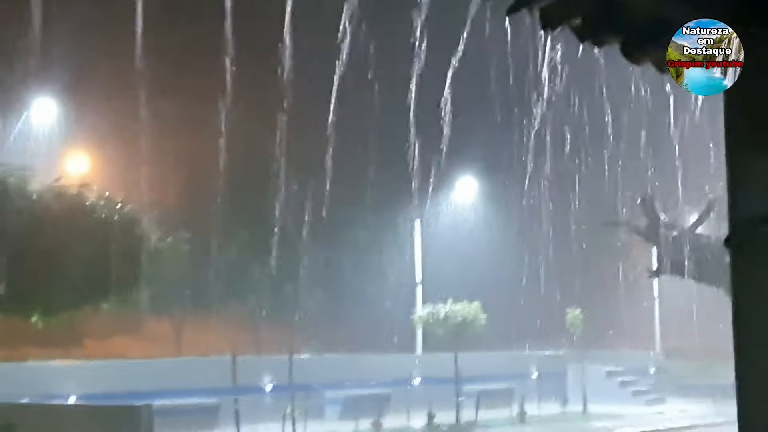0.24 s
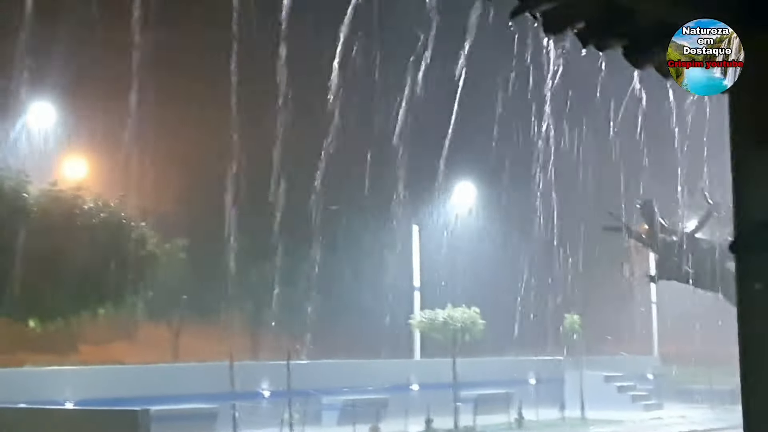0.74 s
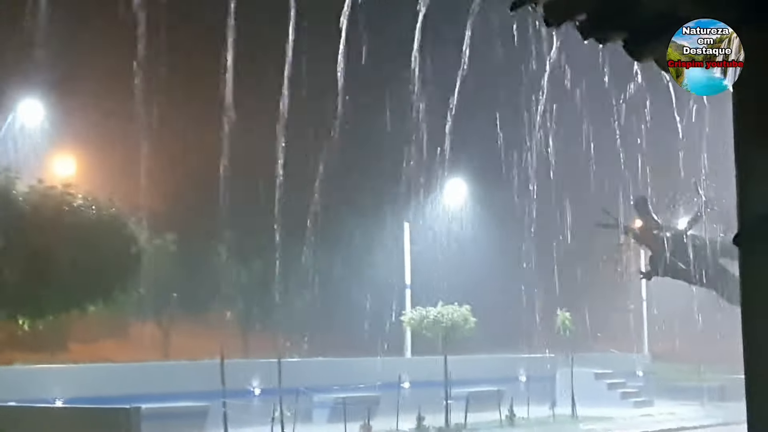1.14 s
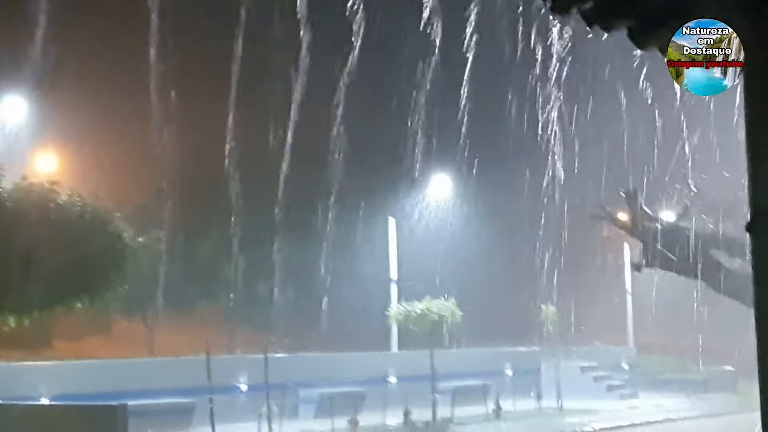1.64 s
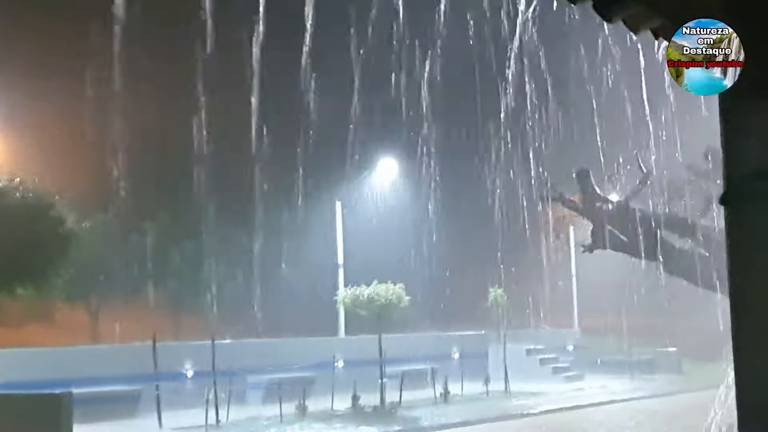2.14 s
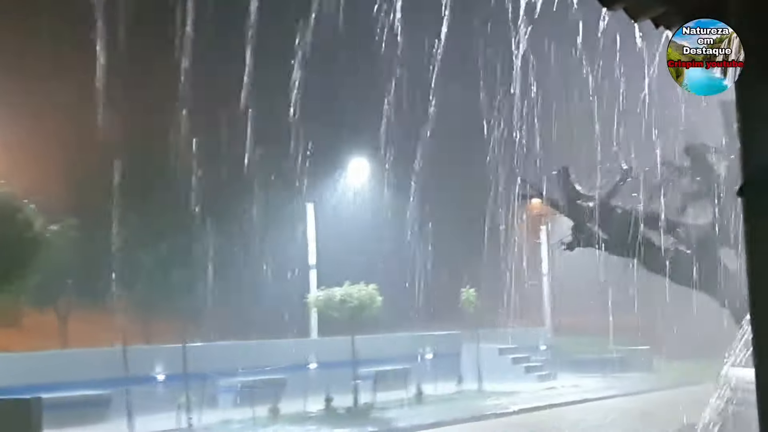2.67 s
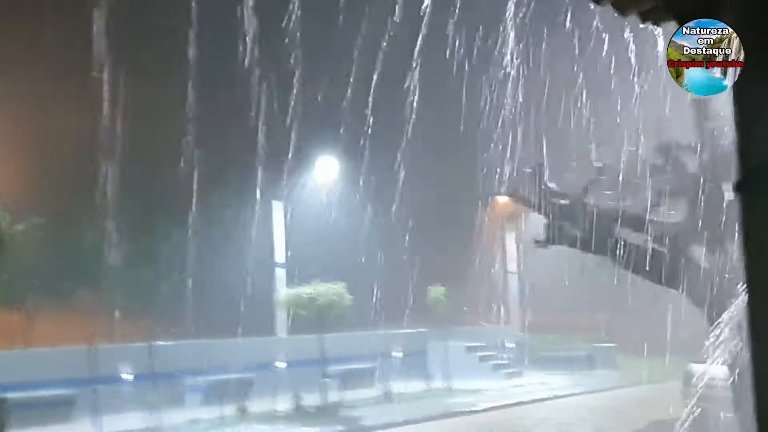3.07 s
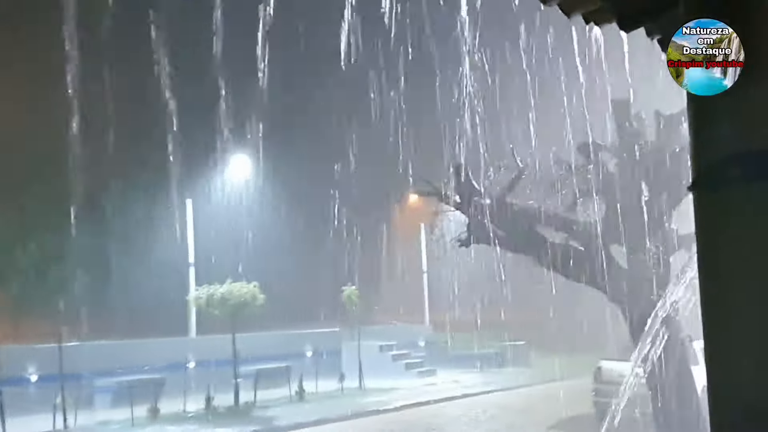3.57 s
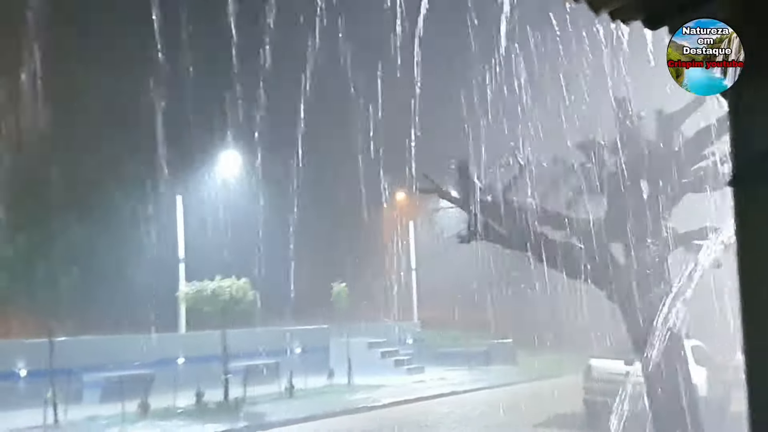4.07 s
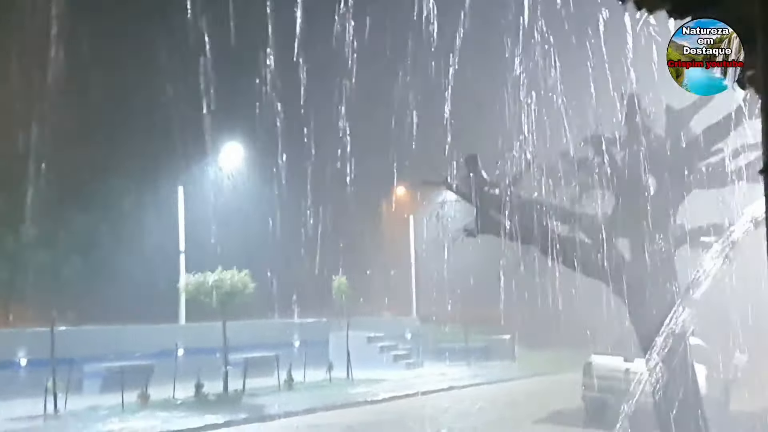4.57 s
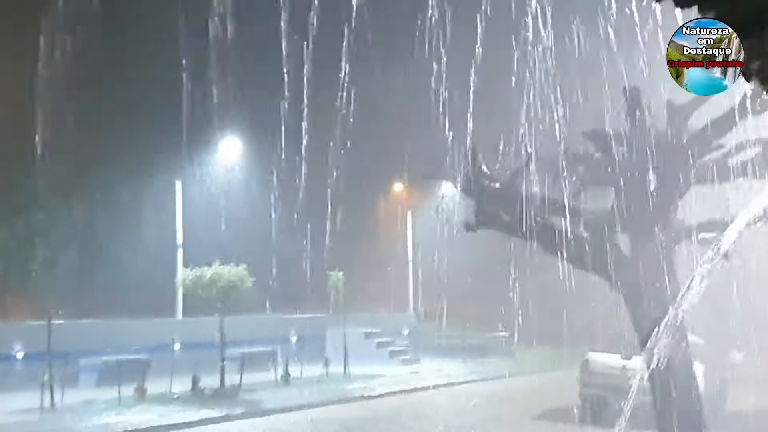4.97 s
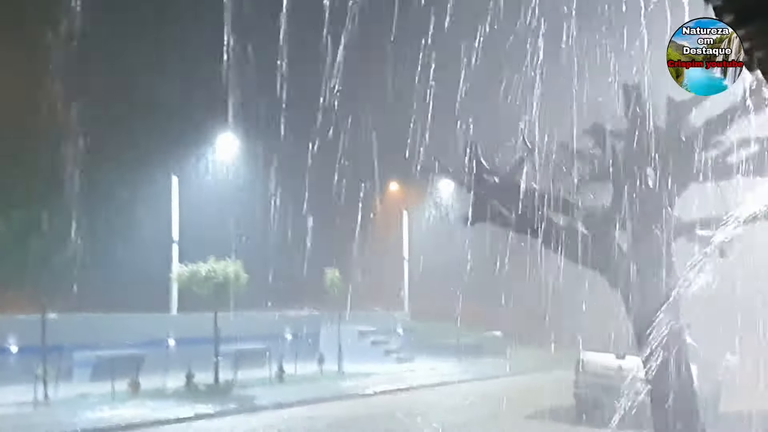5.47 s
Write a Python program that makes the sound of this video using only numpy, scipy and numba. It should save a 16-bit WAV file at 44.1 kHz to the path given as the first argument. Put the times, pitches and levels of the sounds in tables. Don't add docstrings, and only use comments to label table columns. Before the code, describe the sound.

Under the eaves on a rainy night, a dense bright hiss runs throughout. Roof streams land an arm's length away in uneven slugs, splashing and breaking into fizzing spray. Low plops and brief hollow rings dot the first half; hard ticks crowd the second, with a very sharp hit near 5.4 seconds that dips the sound for an instant. Close stereo hand-held phone, outdoors.

```python
import sys
import numpy as np
from scipy import signal
from scipy.fft import rfft, irfft, next_fast_len
from scipy.io import wavfile
from scipy.ndimage import uniform_filter1d
from numba import njit

SR = 44100
rng = np.random.default_rng(int(sys.argv[2]) if len(sys.argv) > 2 else 0)


def field_ratio(decibels):
    return 10 ** (np.asarray(decibels, dtype=float) / 20)


def waveform_to_disk(signal):
    frames = np.transpose(np.atleast_2d(signal))
    scaled = np.clip(frames, -1, 1) * 32767
    samples = np.round(scaled).astype(np.int16)
    wavfile.write(sys.argv[1], SR, samples)


N = 252252
PORT_GAP_S = 0.0004084
SPOUT_LEAD_S = 0.000367

# f/Hz, level/dB
LEFT_PORT = [(30, -24.5), (60, -17), (95, -7.5), (170, -13), (450, -11.5), (1200, -8), (1900, -6.5),
             (2300, -5), (3000, -3.5), (6300, -6.5), (7000, -8.5), (7600, -17.5), (12500, -10.5),
             (15700, -8)]


def level(x, db):
    return x * field_ratio(db) / np.sqrt(np.mean(x ** 2))


def gain_db(table, hz):
    f, db = np.transpose(table)
    return np.interp(np.log(np.maximum(hz, 1)), np.log(f), db, left=db[0] - 26)


def colour(x, table):
    size = 4096
    cepstrum = irfft(np.log(field_ratio(gain_db(table, np.fft.rfftfreq(size, 1 / SR)))))
    cepstrum[1:size // 2] *= 2
    cepstrum[size // 2 + 1:] = 0
    impulse = irfft(np.exp(rfft(cepstrum)))
    return signal.fftconvolve(x, impulse)[:N]


def walk(rate):
    hold = int(SR / rate)
    steps = np.repeat(rng.standard_normal(N // hold + 1), hold)
    smooth = uniform_filter1d(uniform_filter1d(steps, hold), hold)[:N]
    return smooth / smooth.std()


def follow(table):
    s, *columns = np.transpose(table)
    lines = [np.interp(np.arange(N) / SR, s, c) for c in columns]
    return [c - c.mean() for c in lines]


def surges(table, half_s):
    s, db = np.transpose(table)
    age = np.arange(0, N, 32) / SR - s[:, None]
    bells = np.exp(-(age / (half_s * np.where(age > 0, 1.3, 1))) ** 2)
    return np.repeat(db @ bells, 32)[:N]


def flows():
    # t/s, rain/dB, stream/dB
    flow_curve = [(0, -31.5, -32), (.4, -31, -31.5), (.52, -28.5, -29.5), (.95, -29, -29),
                  (1.45, -29.5, -30.5), (2.0, -30, -29.5), (2.5, -30, -30), (3.2, -29.5, -29.5),
                  (3.8, -30, -30), (4.6, -30.5, -29.5), (5.25, -30, -29.5), (5.72, -31, -30)]
    # t/s, level over the usual patter/dB
    sheets = [(0.132, 3), (0.634, 5), (1.115, 3.0), (1.384, 3), (1.661, -3.5), (2.829, 4.5), (3.253, 3.5),
              (3.692, 3), (4.4, 2.5), (4.507, 3.0), (4.737, 2.5), (4.824, 2.5), (5.019, 3), (5.28, 3.0)]
    # t/s, level over the usual splash/dB
    slugs = [(.122, 5.5), (.274, 3.5), (.455, 3), (.495, 7), (.9, 1.5), (.94, 5.5), (1.008, 6.5),
             (1.265, 4), (1.546, -4.5), (1.676, -4), (1.858, 3.5), (1.921, 6.5), (2.165, 3), (2.19, 4.5),
             (2.34, 4), (2.377, 6.5), (2.607, 3), (2.731, 4), (2.888, 5.5), (3.205, 5), (3.49, 5),
             (3.515, 5.5), (3.714, -6), (4.288, 5.5), (4.6, 5), (4.938, 8.5), (5.128, -5), (5.435, -6),
             (5.578, 4), (5.682, 5)]
    # t/s, level over the usual spray/dB
    spray_bursts = [(0.022, 3), (0.222, 3.5), (0.272, 3.5), (0.327, 4.5), (0.629, 3.5), (0.673, 5),
                    (0.766, 5.5), (0.918, 5), (1.374, -4.0), (1.517, 3), (1.946, 4.5), (2.31, -5.5),
                    (2.37, 4.5), (2.716, 6.5), (3.158, -4), (3.198, 3.5), (3.455, 3.5), (3.609, 3),
                    (3.702, -5), (3.741, 6.5), (3.861, 4.5), (3.981, -4), (4.193, 4), (4.395, 3.5),
                    (4.824, 3.0), (4.866, 5), (4.979, 4), (5.116, 4.0), (5.181, 3.5), (5.338, 4)]
    gust, stream = follow(flow_curve)
    rain = gust + surges(sheets, half_s=.015)
    splash = 1.6 * stream + surges(slugs, half_s=.019) + .9 * walk(22)
    spray = 1.4 * stream + surges(spray_bursts, half_s=.013) + .9 * walk(24)
    return rain, splash, spray


@njit
def grains(n, start, lead, hz, cycles, glide, left, right):
    out = np.zeros((2, n))
    for g in range(len(start)):
        length = int(6 * cycles[g] * SR / hz[g]) + 2
        for c in range(2):
            t = start[g] + c * lead[g]
            first = int(np.ceil(t))
            w = complex(-hz[g] / cycles[g], 2 * np.pi * hz[g]) / SR
            z = np.exp(w * (first - t)) * (left[g] if c == 0 else right[g])
            p, turn = np.exp(w), np.exp(6j * glide[g] * w.imag / length)
            for i in range(max(first, 0), min(first + length, n)):
                out[c, i] += z.imag
                z *= p
                if (i - first) * 6 < length:
                    p *= turn
    return out


def shower(count, flow_db, lo_hz, hi_hz, cycles, glide, spread_db, tilt, pan_db, from_spout):
    when, pitch, source, side = rng.random((count, 4)).T
    pan_draw, ring_draw = rng.standard_normal((count, 2)).T
    size_draw = rng.exponential(size=count)
    passed = np.cumsum(field_ratio(flow_db))
    start = np.interp(when, passed / passed[-1], np.arange(N))
    hz = lo_hz * (min(hi_hz, .45 * SR) / lo_hz) ** pitch
    lead = SR * np.where(source < from_spout, SPOUT_LEAD_S, PORT_GAP_S * (2 * side - 1))
    size_db = np.minimum(spread_db * size_draw, 15) + flow_db[start.astype(int)] / 2
    size = field_ratio(size_db) * hz ** tilt
    pan = field_ratio(pan_db * pan_draw / 2)
    ring_cycles = cycles * np.exp(0.25 * ring_draw)
    return level(grains(N, start, lead, hz, ring_cycles, glide + 0 * hz, size * pan, size / pan), 0)


def struck(table, cycles, glide, early_s, lead_s, base_db):
    s, db, hz, pan_db = np.transpose(table)
    left, right = field_ratio(base_db + db + pan_db / 2), field_ratio(base_db + db - pan_db / 2)
    same = np.ones(len(s))
    return grains(N, (s - early_s) * SR, lead_s * SR * same, hz, cycles * same, glide * same, left, right)


def veil(flow_db):
    size = next_fast_len(N)
    hz = np.fft.rfftfreq(size, 1 / SR)
    like = np.clip(1.0 * np.sinc(2 * hz * PORT_GAP_S) * hz / (hz + 12), -1, 1)
    mid, side = (rfft(rng.standard_normal(size)) * np.sqrt(1 + s * like) for s in (1, -1))
    ports = np.array([mid + side, mid - side])
    out, octave, gust = 0, np.log2(np.maximum(hz, 60) / 60), walk(22)
    for k in range(9):
        band = np.cos(np.pi / 2 * np.clip(octave - k, -1, 1))
        follows = min(k / 5, 1)
        db = follows * (flow_db + .9 * gust + .9 * walk(22))
        out = out + field_ratio(db) * irfft(band * ports, size)[:, :N]
    return level(out, 0)


def vessel():
    # t/s, level/dB, f/Hz, swell/s, t60/s
    rings = [
        (.092, -37, 1164, 0.024, 0.3),
        (1.175, -35, 668, 0.029, 0.57),
        (1.205, -38, 750, .01, .2),
        (4.41, -44, 692, .03, .51),
        (4.7, -45, 660, .034, 0.43),
    ]
    t, out = np.arange(N) / SR, 0
    for s, db, hz, swell, t60 in rings:
        age = np.maximum(t - s, 0)
        drumming = field_ratio(2.5 * walk(50))
        shape = (1 - np.exp(-age / swell)) * 1000 ** (-age / t60) * drumming
        tone = np.sin(2 * np.pi * hz * t + .5 * walk(45))
        out = out + field_ratio(db - gain_db(LEFT_PORT, hz) + 6.5) * shape * tone
    return out


def plops():
    # t/s, peak level/dB, f/Hz, left minus right/dB
    fat_drops = [(0.379, -25, 1810, 0), (0.449, -20, 1890, 0), (0.572, -23, 1900, 0), (0.6, -23, 1700, 2),
                 (0.726, -27, 1760, 0), (1.051, -22, 930, 0), (1.084, -34, 1810, 0), (1.219, -28, 750, 0),
                 (1.326, -23, 1750, 0), (1.419, -27, 1680, 0), (1.509, -24, 1840, 0), (1.918, -28, 1590, 0),
                 (2.441, -32, 1390, 0), (2.879, -30, 1780, 0), (3.297, -24, 1920, 0),
                 (3.705, -25.5, 1410, 0), (3.876, -25, 1630, 0), (4.278, -31, 1800, 0),
                 (4.39, -23, 1320, 0), (4.537, -24, 890, 0), (4.586, -20, 1840, 0), (4.655, -29, 896, 0),
                 (4.889, -24, 1420, 0), (4.928, -25, 1770, 0), (4.989, -25, 1700, 0), (5.083, -24, 1670, 0),
                 (5.263, -22, 1620, 0), (5.574, -28, 1450, 2)]
    return struck(fat_drops, cycles=2.7, glide=.03, early_s=0, lead_s=.0001, base_db=9.5)


def splats():
    # t/s, level over the bed/dB, f/Hz, left minus right/dB
    bright_drops = [(0.1183, 13, 1820, 3), (0.4804, 14, 2330, 2), (0.8961, 14, 2280, -4),
                    (0.9397, 14.5, 2160, -4), (1.1117, 12, 2140, -1), (1.2553, 12, 2150, 1),
                    (1.592, 17, 3880, -1), (1.8576, 11, 2000, -3), (1.9207, 13, 3190, -4),
                    (2.0513, 11, 2070, 1), (2.1834, 5, 2220, -9), (2.3372, 16, 3010, -3),
                    (2.3677, 9, 3880, 1), (2.3822, 8, 2580, -2), (3.2102, 11, 3360, -3),
                    (3.4815, 11, 3190, 3), (3.4939, 11, 3030, 8), (3.5069, 14, 1810, -2),
                    (3.9365, 15, 3750, -8), (5.5779, 11, 3300, 0), (4.2892, 18, 3450, 0),
                    (4.3922, 10, 2930, -8), (4.5373, 11, 3320, -2), (4.6063, 12, 2500, 1),
                    (4.9299, 4, 2340, 1), (5.0307, 14, 3530, -8), (5.1802, 11, 3190, 6),
                    (5.3384, 1, 2220, 5), (5.6439, 21, 3770, -4.5), (5.6766, 4, 2200, 3)]
    return struck(bright_drops, cycles=3.6, glide=0.046, early_s=0.00146, lead_s=0.00039, base_db=-23)


def ticks():
    # t/s, level over the bed/dB, f/Hz, left minus right/dB
    hard_drops = [(0.0218, 12, 5200, 6), (0.673, 7, 4310, 2), (2.3677, 4, 4130, 2), (2.3996, 11, 6200, -8),
                  (2.7175, 12, 5340, -6), (3.0404, 15, 6890, 4), (3.0777, 12, 5860, -9),
                  (3.1064, 11, 5140, -7), (3.1964, 10, 4310, -7), (3.3673, 13, 6890, -5),
                  (3.4554, 10, 5340, -1), (3.6103, 12.5, 5960, -8), (3.7402, 14, 5860, -9),
                  (3.8469, 12, 5170, -1), (3.9358, 10, 4310, 6), (4.189, 20, 6890, -2),
                  (4.3947, 11, 4820, -4), (4.4796, 14, 6720, -6), (4.6026, 13, 4310, -3),
                  (0.7637, 6, 5680, 1), (4.8134, 11, 5510, 0), (4.8602, 15, 5510, 1), (4.9749, 14, 5800, 6),
                  (5.1156, 15, 5680, -3), (5.1566, 15.5, 6170, -8), (5.1802, 11, 5170, -6),
                  (5.2383, 10, 5170, 0), (5.3384, 11, 4650, -3), (5.3812, 24.5, 4500, -5),
                  (5.5187, 13.5, 5680, -2)]
    return struck(hard_drops, cycles=1.9, glide=.04, early_s=0.00066, lead_s=0.00037, base_db=-15)


def roof_streams(splash, spray):
    splashes = shower(count=14000, flow_db=.8 * splash + .1 * spray, lo_hz=1101, hi_hz=3880, cycles=2.97,
                      glide=0.203, spread_db=1.5, tilt=1.0, pan_db=-1.5, from_spout=.15)
    fizz = shower(count=16000, flow_db=.8 * spray, lo_hz=3410, hi_hz=7820, cycles=1.2,
                  glide=0.09, spread_db=2.0, tilt=1.0, pan_db=2.0, from_spout=0.32)
    bubbles = shower(count=1500, flow_db=.8 * splash, lo_hz=1800, hi_hz=7025, cycles=7.9,
                     glide=0.0925, spread_db=-0.5, tilt=0.96, pan_db=0.0, from_spout=0.12)
    strays = shower(count=90, flow_db=0.49 * splash, lo_hz=1800, hi_hz=6900, cycles=1.8,
                    glide=0.044, spread_db=2.5, tilt=0.79, pan_db=1.0, from_spout=0.45)
    slosh = shower(count=1500, flow_db=1.7 * splash, lo_hz=1346, hi_hz=2935, cycles=4.5,
                   glide=0.11, spread_db=2.9, tilt=0.98, pan_db=1.5, from_spout=0.28)
    water = field_ratio(-11) * splashes + field_ratio(-7.0) * fizz + field_ratio(-16.5) * bubbles
    return water + field_ratio(-21) * strays + field_ratio(-21) * slosh


def patter(rain):
    return shower(count=45000, flow_db=.8 * rain + .9 * walk(19), lo_hz=5900, hi_hz=16800, cycles=0.98,
                  glide=0.032, spread_db=1.36, tilt=0.86, pan_db=3.5, from_spout=.05)


def scene():
    rain, splash, spray = flows()
    far = field_ratio(-5.5) * veil(0.17 * rain + 0.072 * splash)
    bed = far + roof_streams(splash, spray) + field_ratio(-4.5) * patter(rain)
    return level(bed, -15) + ticks() + splats() + plops() + vessel()


def low_pass(x):
    return signal.sosfilt(signal.butter(12, 15760, fs=SR, output="sos"), x)


def record(dry):
    # f/Hz, level/dB
    right_port = [(30, -37), (60, -9), (95, -9.5), (450, -14.5), (1300, -9.5), (1850, -7), (2300, -1.5),
                  (3300, -5), (5600, 3), (6400, -2.5), (7600, -18), (9300, -12), (12000, 0.5),
                  (15700, -4.5)]
    # t/s, depth/dB, recovery/s
    ducks = [
        (2.94, -2.5, .02),
        (3.612, -4.5, .035),
        (5.374, -15, .015),
        (5.39, -1, .06),
    ]
    t, duck_db = np.arange(N) / SR, 0
    for s, db, back in ducks:
        age = np.maximum(t - s, 0)
        duck_db = duck_db + db * (1 - np.exp(-age / 0.0028)) * np.exp(-age / back)
    heard = np.array([colour(dry[0], LEFT_PORT), colour(dry[1], right_port)]) * field_ratio(duck_db)
    heard = signal.sosfilt(signal.ellip(12, .2, 80, 15700, fs=SR, output="sos"), heard)
    return low_pass(np.clip(heard, -1, 1))


dry = scene()
out = record(dry)
waveform_to_disk(out)
```